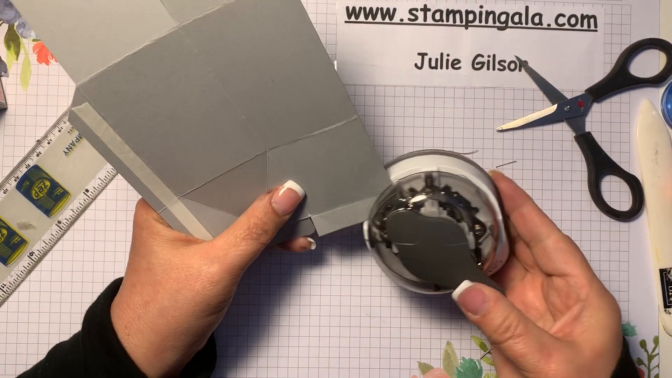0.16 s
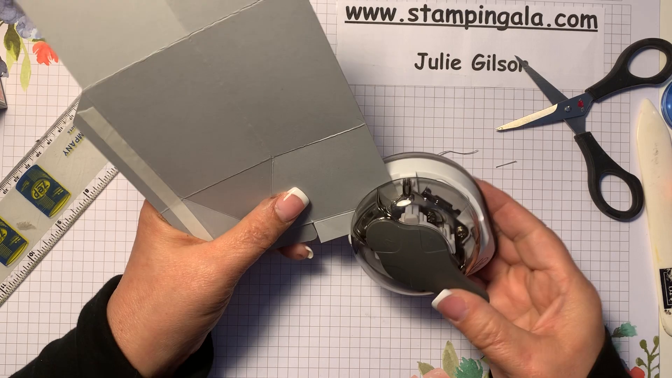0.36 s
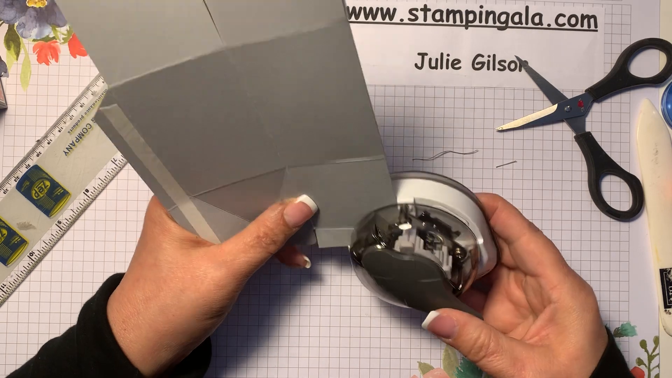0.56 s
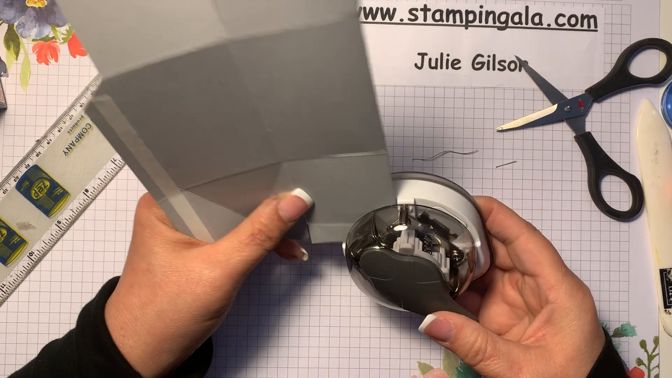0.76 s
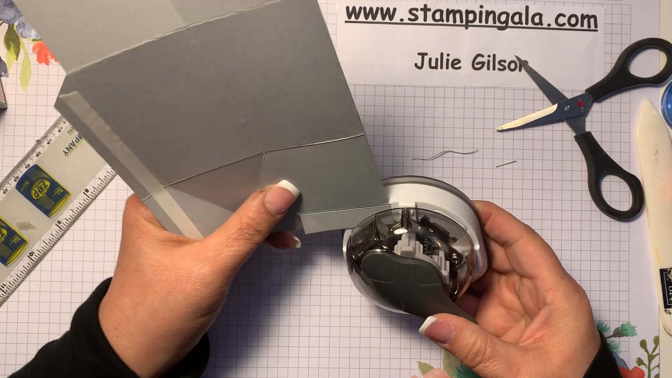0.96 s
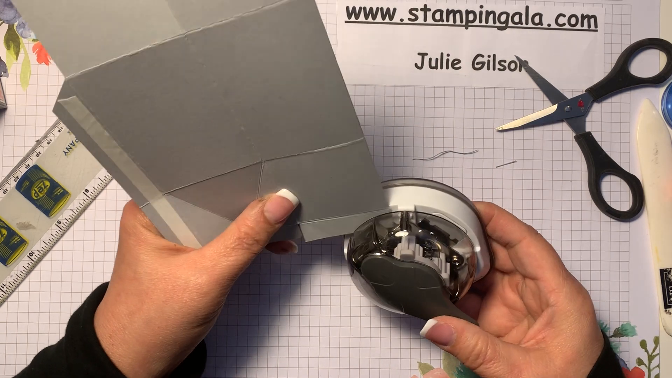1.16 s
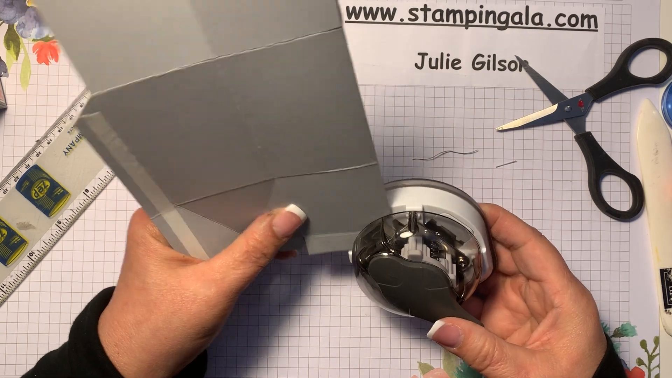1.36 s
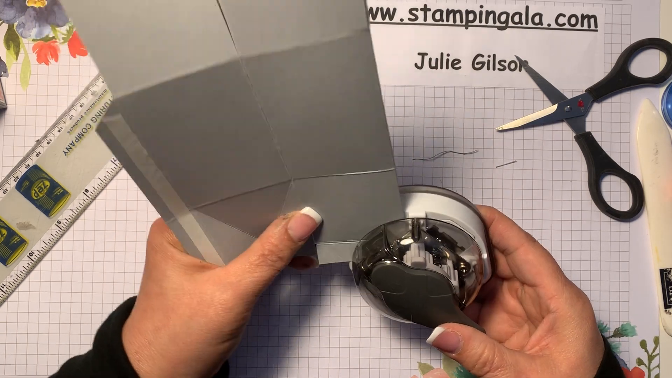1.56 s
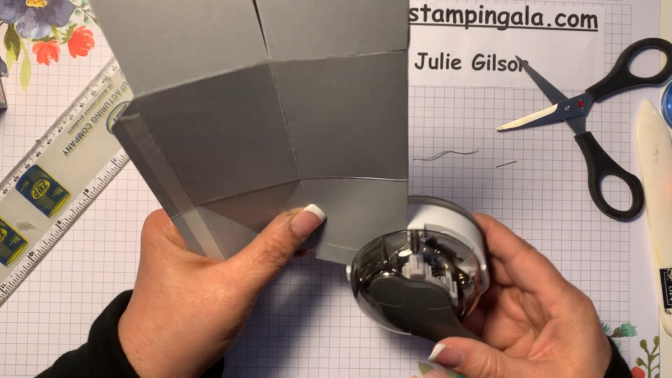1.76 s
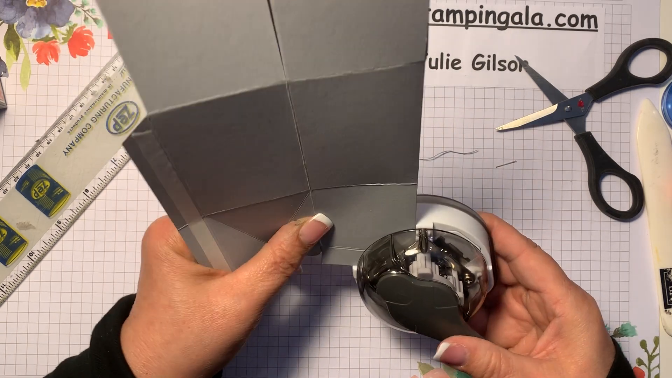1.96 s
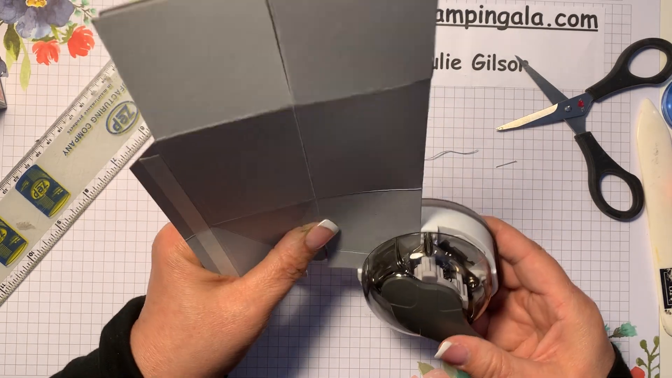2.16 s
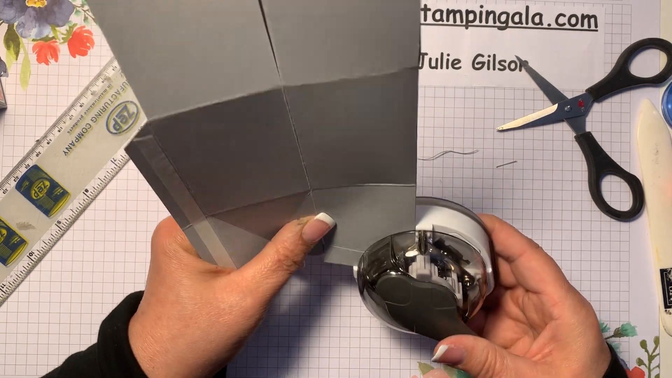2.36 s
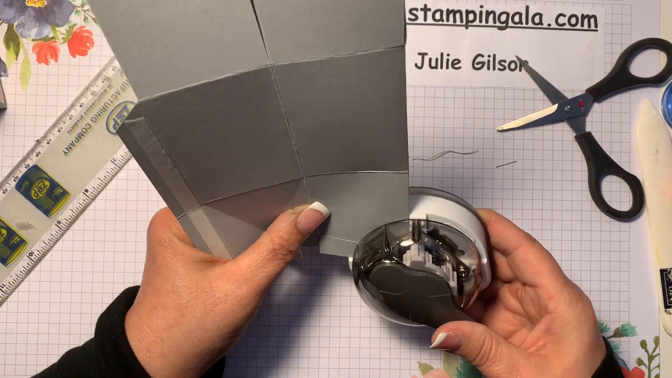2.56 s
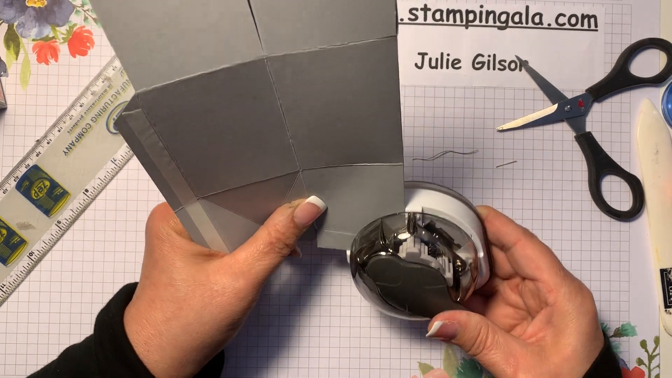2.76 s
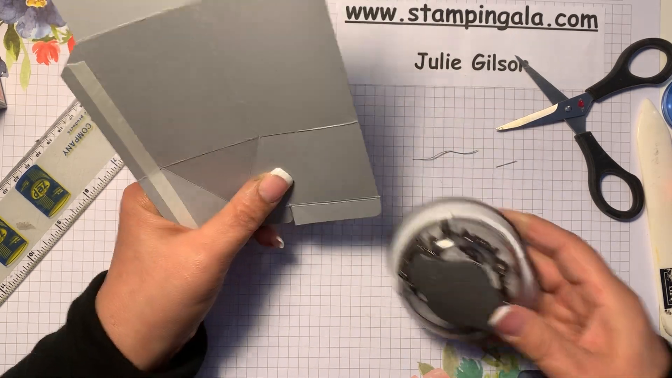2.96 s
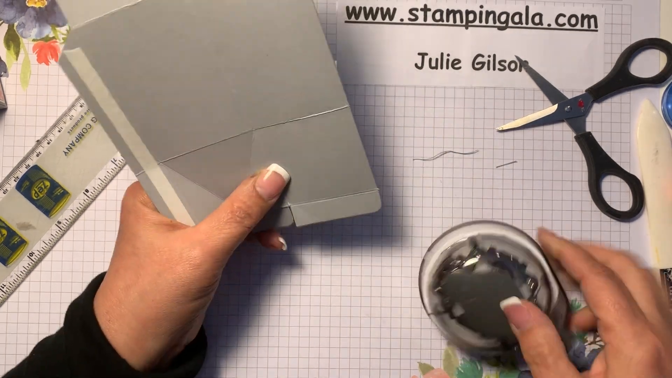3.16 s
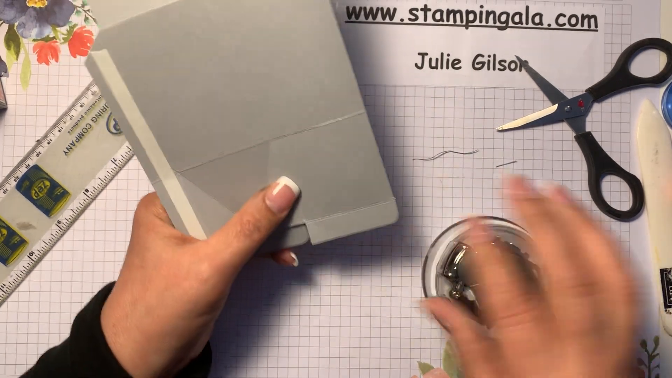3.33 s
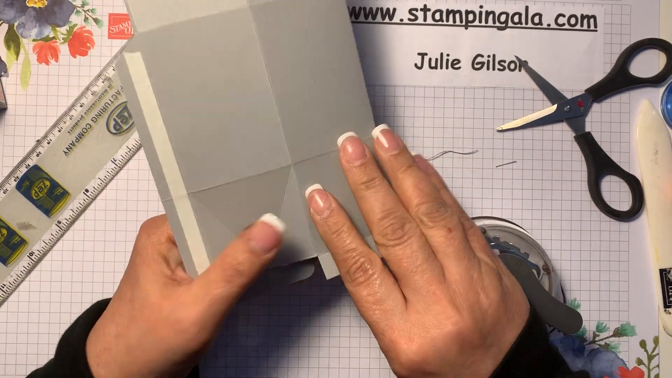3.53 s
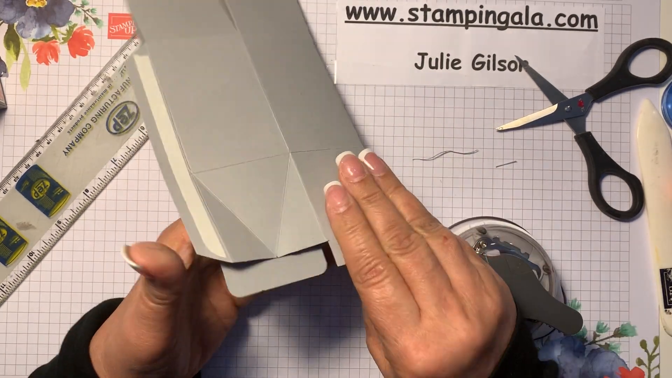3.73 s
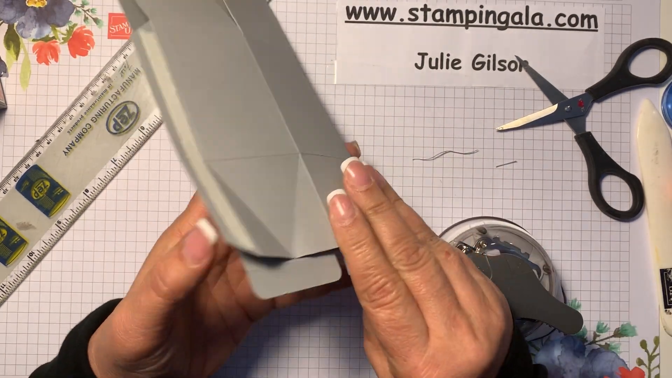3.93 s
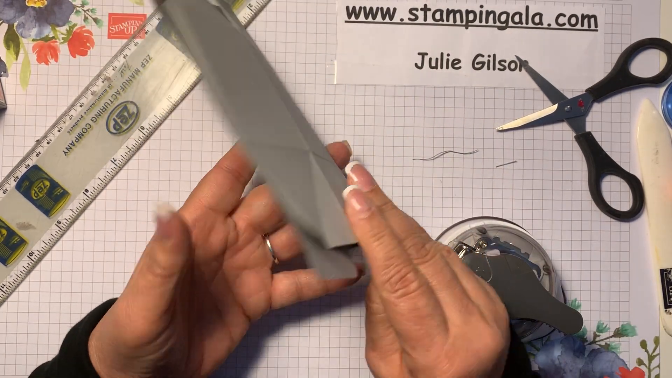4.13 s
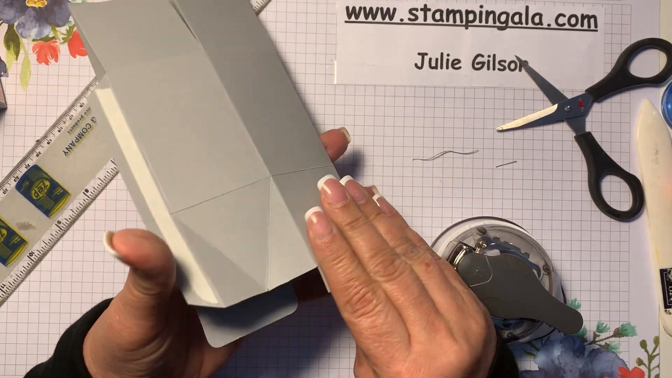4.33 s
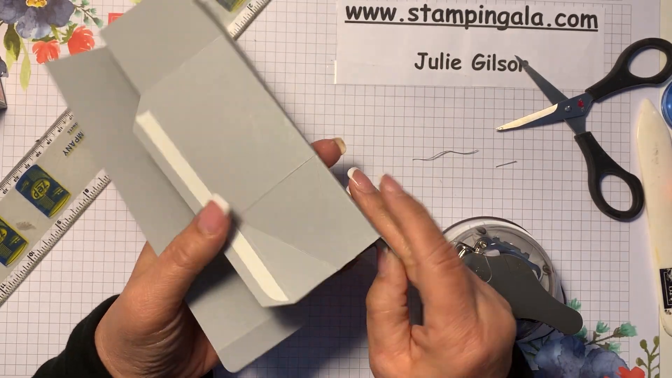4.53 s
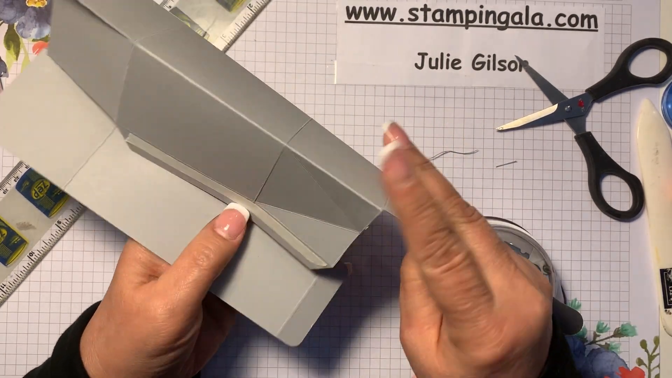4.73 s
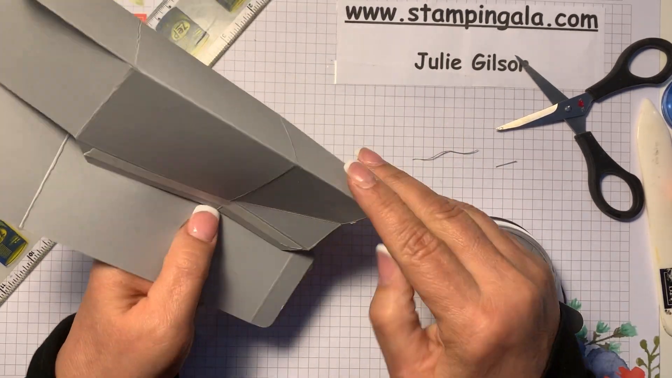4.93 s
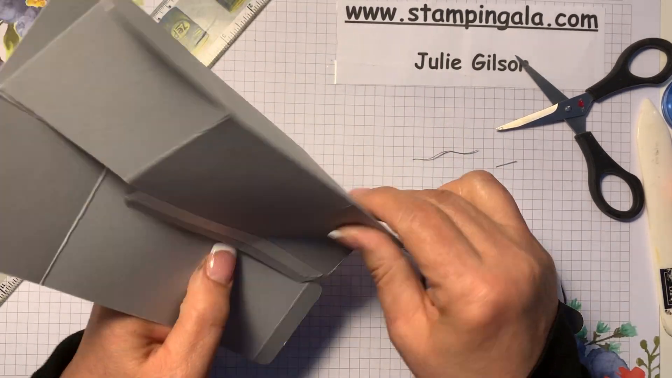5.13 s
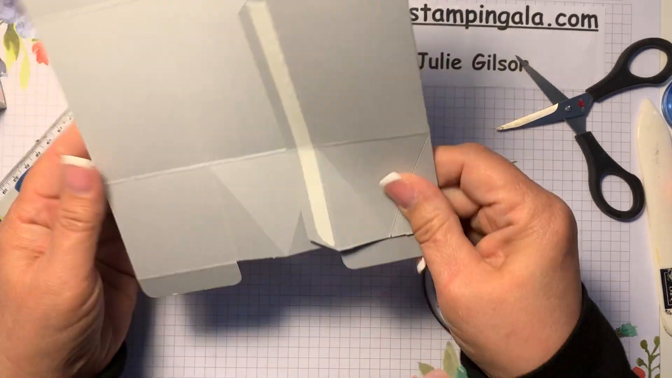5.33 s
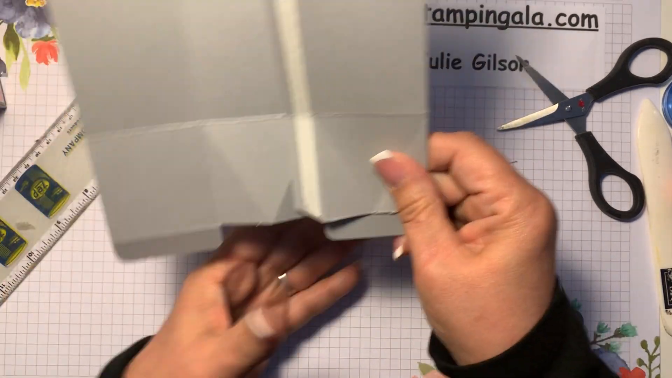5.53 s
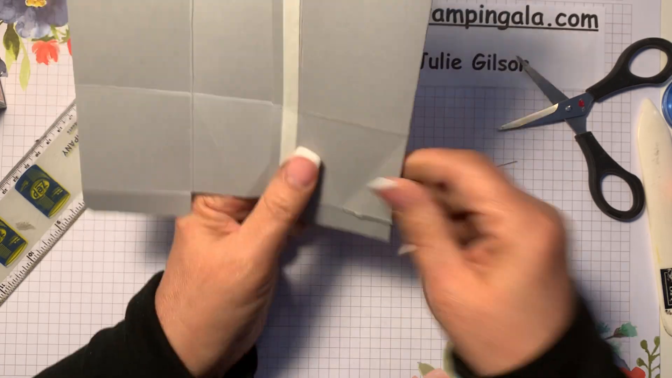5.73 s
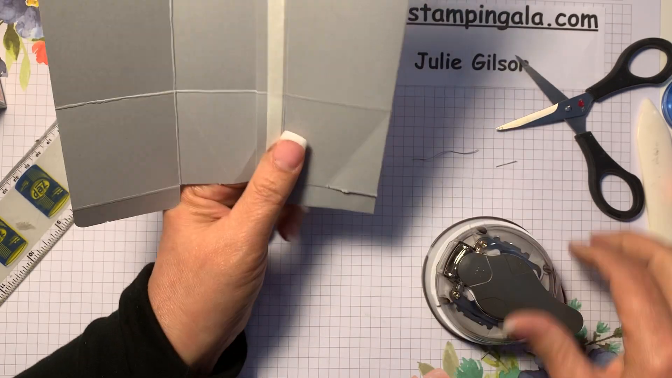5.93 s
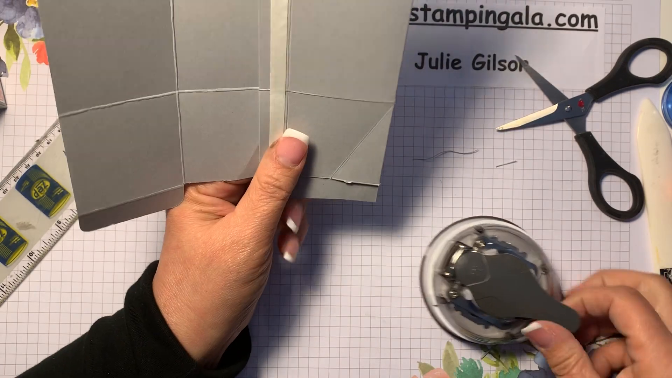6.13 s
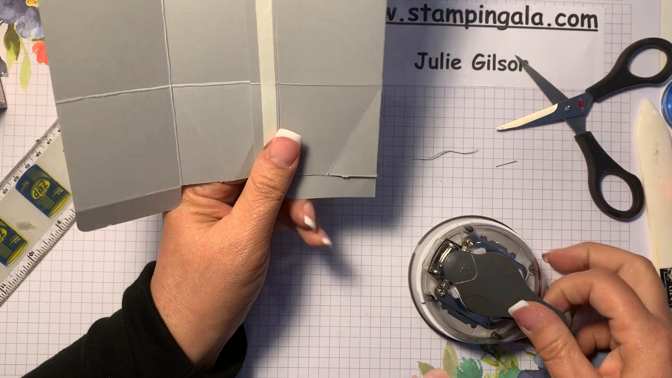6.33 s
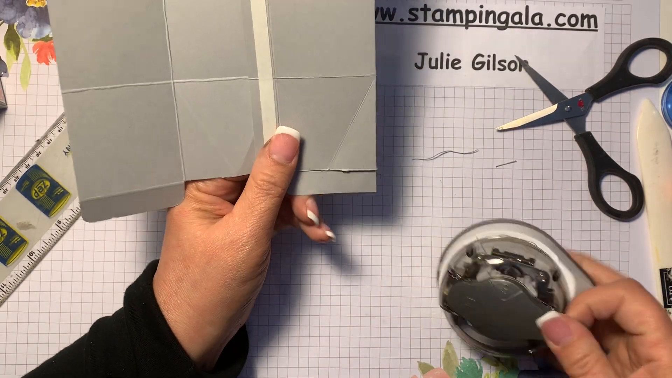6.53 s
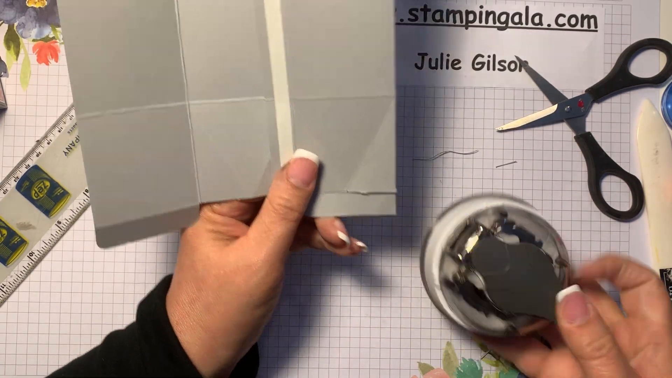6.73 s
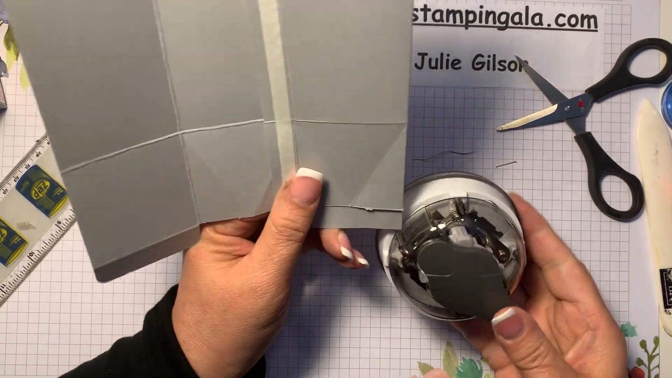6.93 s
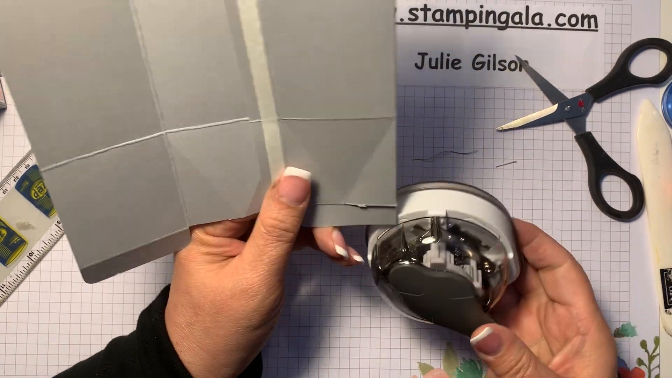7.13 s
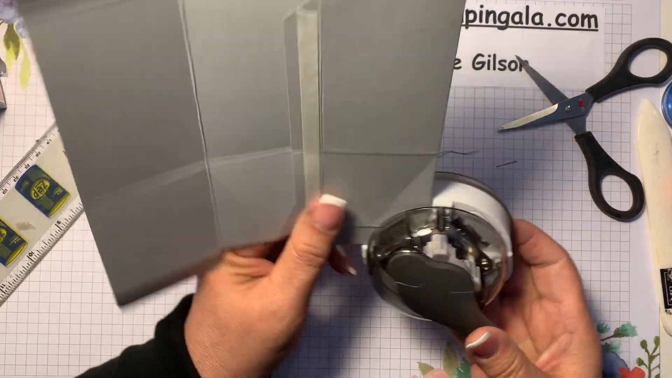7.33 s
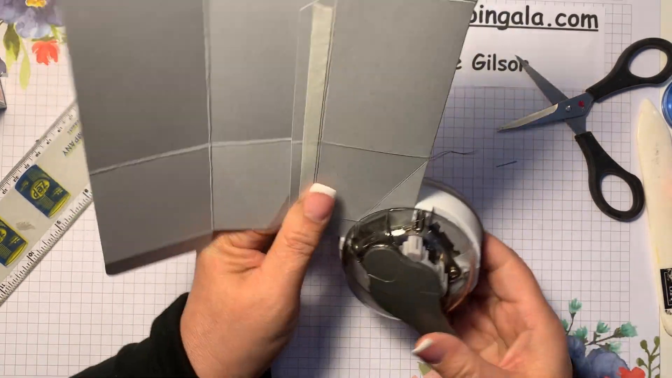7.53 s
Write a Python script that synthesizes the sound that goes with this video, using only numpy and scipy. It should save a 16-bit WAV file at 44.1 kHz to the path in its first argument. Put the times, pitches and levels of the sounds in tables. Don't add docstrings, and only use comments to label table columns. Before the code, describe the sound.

Faint card scrapes and fingernail ticks lead to a sharp mechanical bite and a rapid pair of hard, woody clunks from a hollow plastic punch on a table. Afterwards come irregular papery taps and light friction while the card is turned, low bumps as the punch is picked up, and two bright knocks near the end. Close handheld stereo pickup, dry small room, faint air.

```python
import sys
import numpy as np
from scipy import signal
from scipy.fft import rfft, irfft, next_fast_len
from scipy.io import wavfile

SR = 44100
rng = np.random.default_rng(int(sys.argv[2]) if len(sys.argv) > 2 else 0)


def magnitude_from_level(level_db):
    exponent = np.asarray(level_db, float) / 20
    return 10 ** exponent


def inscribe(sig):
    pcm = np.round(np.clip(np.atleast_2d(sig).T, -1, 1) * 32767)
    wavfile.write(sys.argv[1], SR, pcm.astype(np.int16))


N = 339129

# start in seconds, peak in dB, ring in Hz, scrape in dB relative, crack in dB relative.
PUNCH_SNAPS = [(0.04, -61, 5600, -25, 23), (2.618, -35, 730, -5.5, -12.5),
               (2.643, -40.5, 1900, -16.5, -31.5), (2.653, -12, 2250, -14.5, -8.5),
               (2.662, -18, 700, -5.5, -26), (2.683, -23.5, 1670, -18.5, -28), (2.686, -13, 2880, 2, 9),
               (2.688, -9.5, 692, -11, -22), (2.975, -22.5, 774, -8, -20.5),
               (2.971, -10.5, 3460, -6.5, -8.5), (2.974, -16, 2000, -15, -10),
               (3.097, -26.5, 2100, -3.5, -17.5), (3.26, -14.5, 2500, -8.5, -10),
               (3.268, -7, 4590, -8, 3.5), (3.268, -15, 2755, -21, -20), (6.34, -38.5, 4600, -3, 9.5)]
# start in seconds, peak in dB, ring in Hz,
# t60 in seconds.
BODY_THUDS = [(3.1, -15.5, 320, 0.037), (3.115, -17, 258, 0.046), (3.262, -12.5, 790, 0.039),
              (3.263, -7, 352, 0.027), (3.271, -8.5, 785, .05), (3.287, -14, 350, 0.069),
              (3.31, -17.5, 220, 0.088), (6.168, -28, 344, 0.093), (6.21, -45, 295, 0.14),
              (6.298, -38, 261, 0.14), (6.316, -50.5, 340, 0.071), (6.336, -41, 214, 0.18),
              (6.448, -38.5, 289, 0.11), (6.47, -41.5, 218, 0.16), (6.56, -51.5, 199.6, 0.24),
              (6.166, -32, 800, 0.043), (1.965, -38.5, 389, 0.066), (7.419, -31.5, 302, 0.074),
              (0.459, -50, 253, 0.042), (5.752, -53.5, 180.4, .08)]
# start in seconds, level in dB, ring in Hz, t60 in seconds.
LEVER_RING = [
    (3.27, -46, 344, 1.8),
]
# start in
# seconds, peak in dB, contact time in ms.
TABLE_BLOWS = [(0.34, -50, 2.2), (0.617, -44.5, 1.2), (0.914, -38, 2.2), (1.011, -40.5, 0.52),
               (1.467, -40, 0.76), (1.704, -43, 0.27), (1.963, -48.5, 0.14), (2.124, -47.5, 1.6),
               (4.318, -25.5, 10), (5.921, -47.5, 0.63), (6.06, -38.5, 2.7), (6.168, -19, 3.2),
               (6.213, -39, 3.5), (6.296, -22.5, 7.4), (6.449, -23.5, 9.8), (6.944, -44.5, 2.5),
               (7.098, -33.5, 0.85), (7.392, -30.5, 2.5), (7.419, -27, 0.45), (3.085, -29, 4.6),
               (3.099, -6, 3), (3.118, -16, 7), (3.126, 1, 12.2), (3.260, -14, 0.21), (3.270, -0.5, 0.3),
               (3.292, -24, 9), (3.361, -15.5, 4.6)]
# frequency in Hz, level in dB, t60 in seconds.
TABLE_MODES = [(56.5, -17.5, 0.15), (90.6, -11, 0.13), (121.5, -13, 0.33), (144.4, -5.5, 0.15),
               (183, -4.5, 0.067), (220, 3.5, 0.1), (264, -11, 0.33), (350, 7, 0.085), (412.4, -2, 0.089),
               (471.3, 0.5, .1), (550, 5, 0.061), (720, -5.5, .08), (785, 8.5, 0.044), (1000, -3.5, 0.091)]
# start in seconds, peak in dB, ring in Hz, edge sharpness in dB.
CARD_TAPS = [(0.177, -47, 3980, -3), (0.194, -38, 1520, -14), (.273, -33.5, 1140, -38),
             (.617, -38, 1200, -14), (.699, -32.5, 1420, -30), (1.016, -34, 977, -29),
             (1.144, -48.5, 1400, -14), (1.465, -33, 1420, -15), (1.488, -34.5, 1090, -11),
             (1.679, -31.5, 1486, -13.5), (1.701, -37.5, 1080, -70), (1.731, -39, 877.5, -31),
             (1.962, -20, 1094, -29), (2.124, -49.5, 980, -9), (2.44, -51.5, 2210, -21.5),
             (5.921, -41.5, 1532, -14.5), (6.011, -52.5, 1086, 2.5), (6.162, -24, 2070, -11),
             (6.712, -32, 2210, -41.5), (6.721, -33, 2500, -36), (6.944, -53, 785, -6.5),
             (7.099, -15.5, 969, -10), (7.392, -31.5, 1007, -29.5), (7.418, -7, 905, -40),
             (7.574, -41, 2440, -21),
             (3.554, -24.5, 887, -13), (3.589, -45.5, 1020, 0.5), (3.664, -38, 930, -9.5),
             (3.784, -25.5, 2244, -33), (3.82, -29, 983, -15.5), (3.864, -30, 1826, -16),
             (3.888, -38, 1000, -11), (3.943, -34, 600, -11.5), (4.31, -32.5, 1030, -16),
             (4.32, -28.5, 1414, -14.5), (4.346, -32, 1050, -12), (4.505, -36, 1530, -31),
             (4.646, -24.5, 1530, -9.5), (4.754, -12, 1360, -14.5), (4.92, -28.5, 1010, -20),
             (4.948, -32, 1190, -13.5), (5.08, -28.5, 1006, -14), (5.173, -29, 974, -18),
             (5.184, -29.5, 1520, -2), (5.261, -29, 990, -2.5), (5.738, -29.5, 1000, -15)]
# start in seconds, peak in dB, ring in Hz, edge sharpness in dB.
FIBRE_TICKS = [(.115, -66, 1400, -15), (0.131, -51, 1400, -19), (.179, -49, 3220, -20),
               (.243, -46, 3370, -8), (.25, -42, 3340, 4), (0.307, -37.5, 1310, -20),
               (0.491, -50, 1600, -15), (.553, -60, 3400, -10), (.564, -49, 3400, -13),
               (.587, -52, 1250, -14), (0.685, -42, 1470, -14), (.817, -43, 1470, -15),
               (.894, -49, 1310, -2), (1.094, -47, 1490, -18), (1.259, -61, 1320, -10),
               (1.391, -52, 1540, -9), (1.668, -40.5, 1400, -13), (2.288, -58.5, 920, -18),
               (2.47, -66, 2000, -25), (4.392, -48, 1100, 0), (4.481, -51, 1200, -3),
               (4.631, -43, 1000, -10.5), (4.708, -37, 1400, -14), (4.733, -36, 1400, -2),
               (4.829, -44, 1200, -10.5), (4.89, -35, 900, -11), (4.998, -59, 1000, 9.5),
               (5.025, -47, 4100, 1), (5.065, -35, 950, -14), (5.191, -30.5, 3450, -15.5),
               (5.265, -26.5, 3600, -17.5), (5.318, -31, 1000, -22.5), (5.679, -48, 950, -25),
               (6.281, -45, 2010, -3), (6.7, -46, 910, -25.5)]
# time of most pressure in seconds, rise in seconds, fall in seconds, scrape in dB, fibre hiss
# in dB relative.
CARD_SLIDES = [(.06, 0.023, 0.058, -69.5, 4), (.12, 0.0053, 0.035, -64, 9), (.25, 0.018, 0.06, -50, 8.5),
               (.33, 0.1, 0.021, -48.5, 1.5), (.5, 0.21, 0.049, -56, -3.5), (.6, 0.051, 0.042, -43.5, -0.5),
               (.696, 0.018, 0.072, -46.5, -1), (.826, 0.022, 0.14, -49.5, 3.5),
               (1.026, 0.043, 0.1, -60, 1), (1.283, 0.089, 0.041, -60.5, 1),
               (1.4, 0.024, 0.29, -60.5, 12.5), (1.48, 0.066, 0.11, -58, -31),
               (1.7, 0.025, 0.12, -57, -23.5), (1.955, 0.028, 0.023, -47.5, -6),
               (2.683, 0.034, 0.0072, -30.5, -18), (2.704, 0.0098, 0.11, -34, 5),
               (2.969, 0.061, 0.047, -39.5, -0.5), (3.1, 0.013, 0.12, -70, 15),
               (3.255, 0.28, 0.04, -53.5, 1.5), (3.283, 0.044, 0.076, -36.5, -44),
               (3.36, 0.055, 0.38, -59.5, -12),
               (3.639, 0.063, 0.055, -51, 13.5), (3.769, 0.018, 0.037, -43, 2),
               (3.867, 0.015, 0.012, -36.5, 11), (3.928, 0.15, 0.37, -60.5, -6.5),
               (4.161, 0.052, 0.064, -58, 2), (4.327, 0.022, 0.053, -50.5, -2),
               (4.4, 0.012, 0.034, -50.5, 5.5), (4.521, 0.071, 0.046, -48.5, 7),
               (4.663, 0.1, 0.25, -49, 6.5), (4.756, 0.015, 0.015, -35, 4), (4.965, 0.13, 0.019, -45, 0.5),
               (5.078, 0.048, 0.3, -62.5, -28), (5.185, 0.015, 0.16, -48, -3.5),
               (5.359, 0.19, 0.049, -45, 16), (5.43, 0.045, 0.13, -60.5, -9), (5.71, 0.029, 0.11, -55, -5),
               (5.791, 0.097, 0.018, -55.5, 13.5),
               (6.04, 0.094, 0.22, -65, -6), (6.168, 0.028, 0.12, -50, 6.5),
                (6.338, 0.021, 0.16, -78, 13.5), (6.561, 0.06, 0.094, -59.5, 6.5),
                (6.712, 0.02, 0.095, -60.5, -5), (7.103, 0.017, 0.087, -55.5, -4),
                (7.387, 0.072, 0.049, -51, 9), (7.441, 0.11, 0.018, -49, -6),
                (7.574, 0.17, 0.51, -62.5, -11), (7.654, 0.05, 0.015, -50.5, 2.5)]
# time in seconds, rise in seconds, fall in seconds, level in dB.
SHEET_FLEXES = [(.229, 0.063, 0.016, -59), (.331, 0.1, 0.039, -55.5), (1.026, 0.087, 0.28, -75),
                (1.465, 0.0052, 0.068, -52), (1.688, 0.098, 0.47, -84), (1.964, 0.025, 0.013, -49),
                (2.705, .01, 0.087, -40.5), (2.969, 0.093, 0.15, -58), (3.101, 0.0095, 0.021, -25.5),
                (3.283, 0.036, 0.075, -36), (3.556, 0.0195, .12, -72), (3.65, 0.14, 0.047, -49),
                (3.773, 0.019, 0.038, -43), (3.869, 0.034, 0.023, -46), (4.12, 0.19, 0.29, -67.5),
                (4.328, .02, 0.08, -47.5), (4.518, 0.038, 0.042, -52), (4.8, .25, 0.22, -48.5),
                (5.072, 0.014, 0.038, -47.5), (5.185, 0.019, 0.41, -54.5), (5.34, 0.68, 0.13, -61),
                (5.789, 0.088, 0.016, -53), (6.2, 0.39, 0.43, -61.5), (7.104, 0.017, 0.057, -52.5),
                (7.433, 0.056, 0.021, -38.5), (7.651, 0.17, 0.022, -64.5)]
# frequency in Hz, width in Hz, level in dB.
SHEET_MODES = [(330, 120, -8), (520, 130, -5), (780, 130, -5), (980, 110, 1), (1200, 140, -4),
               (1450, 140, -2.5), (1850, 140, -4)]
# time in seconds, rise in seconds, fall in seconds, level in dB.
BASE_SCUFFS = [
    (6.19, 0.0485, 0.35, -56.5),
    (6.57, 0.07, 0.058, -66),
    (6.715, 0.12, 0.038, -61),
]
# frequency in Hz, width in Hz, level in dB.
HOUSING_MODES = [(1020, 90, -3), (1980, 110, 0), (2350, 130, 0), (3250, 200, -8)]
# time in seconds, rise in seconds, fall in seconds,
# level in dB, pitch in Hz.
EDGE_RASPS = [(0.121, 0.1, .025, -69.5, 2100), (1.43, 0.05, 0.11, -49.5, 3550),
              (6.24, 0.05, 0.089, -60, 2000), (6.2, 0.011, 0.0096, -51, 2400),
              (8.5, 0.014, 0.01, -48, 3700), (5.6, 0.054, 0.026, -55, 3600), (8.3, 0.05, 0.073, -70, 2200),
              (3.2, 0.074, .07, -53.5, 830)]
# time in seconds, rise in seconds, fall in seconds,
# drag in dB, slow sway in dB relative.
TABLE_SHUDDERS = [(2.2, 0.38, 0.25, -90, 13), (2.75, 0.091, 0.27, -78.5, 10.5), (3.33, .1, 0.87, -59, 5),
                  (3.75, 0.77, 0.44, -60.5, -6.5), (4.35, .06, 0.15, -68.5, 6.5),
                  (5.38, 0.2, 0.2, -63, -0.5), (5.76, 0.065, 0.072, -73, 16.5),
                  (6.24, 0.24, 0.2, -53, -17.5), (6.5, 0.05, 0.18, -65, -11.5)]
# frequency in Hz, t60 in seconds.
ROOM_DECAY = [(100, 1), (500, 0.58), (2000, 0.071), (6000, 0.054), (14000, 0.38)]
# frequency in Hz, level in dB per Hz.
AIR_COLOUR = [(15, -28), (25, 7), (117, 1), (531, -4.5), (1890, -37.5), (6050, -18), (9570, -31.5),
              (16000, -23.5)]
# frequency in Hz, left in dB, right in dB, shared part from 0 to 1.
MIC_PORTS = [(107, 1.5, 0, .95), (600, -3, -5, 0.87), (1400, 3, -3, 1), (2600, 2, -0.5, 0.7),
             (4360, -1.5, -1.5, 0.1), (6300, -6.5, -3.5, 0.3), (8860, -3, -4, 1), (13600, -13, -12, 0.93)]
# frequency in Hz, lead of the right port in radians.
RIGHT_LEAD = [(40, -.15), (250, -.28), (900, -.5), (2800, -3.1), (4200, -1.6), (5950, -3.14), (7800, 0)]

TAP_ROUGH, SNAP_ROUGH = 0.7, 1.1
TAP_T60_S, SNAP_T60_S = 0.034, 0.019
HARD_TAP_SHORTENS = 0.173
BASS_LAG_CYCLES = 1.6
RESTING_DB, TABLE_RESTING_DB = -81, -85.5
SLIDE_SHAKES_SHEET_DB = -14.5
STROKE_ROUNDNESS = 1.4
ROOM_TONE_DB = -75.5
TREBLE_TURN_HZ = 3700


def punch_snaps():
    events = [(*row, SNAP_T60_S) for row in PUNCH_SNAPS]
    return contacts(events, ring_db=-2.0, scrape_db=3.5, crack_db=9.0, rise_s=0.00087, rough=SNAP_ROUGH)


def contacts(events, ring_db, scrape_db, crack_db, rise_s, rough):
    length = 4096
    out, t = np.zeros((2, N + length)), np.arange(length) / SR
    noises = rng.standard_normal((len(events), 3, 2, length))
    scrapes = rms_one(band(noises[:, 1], 1200, 5600))
    cracks = rms_one(band(noises[:, 2], 7800, 16500))
    for k, (s, db, hz, scrape_rel, crack_rel, t60) in enumerate(events):
        t60 = np.clip(t60, 0.004, 0.2)
        shape = (1 - np.exp(-t / rise_s)) * magnitude_from_level(-60 * t / t60) * (1 - t / t[-1])
        push_noise = rms_one(band(noises[k, 0], 0.63 * hz, 1.266 * hz))
        tone = np.sin(2 * np.pi * hz * t) + rough * push_noise
        scrape = magnitude_from_level(scrape_rel + scrape_db) * scrapes[k]
        crack = magnitude_from_level(crack_rel + crack_db) * cracks[k] * magnitude_from_level(-25 * t / t60)
        start = round(s * SR)
        out[:, start:start + length] += magnitude_from_level(db) * shape * (magnitude_from_level(ring_db) * tone + scrape + crack)
    return out[:, :N]


def rms_one(x):
    return x / np.sqrt(np.mean(x ** 2) + 1e-20)


def band(x, low_hz, high_hz):
    edges = [low_hz, min(high_hz, 0.45 * SR)]
    return signal.sosfilt(signal.butter(2, edges, "band", fs=SR, output="sos"), x)


def body_thuds():
    events = [(s, db, hz, -30, -40, t60) for s, db, hz, t60 in BODY_THUDS]
    return contacts(events, ring_db=0.5, scrape_db=-0.5, crack_db=1.5, rise_s=0.0005, rough=0.4)


def lever_hum():
    s, db, hz, t60 = LEVER_RING[0]
    push = np.zeros(N)
    push[round(s * SR)] = magnitude_from_level(db)
    return ring(push, hz, t60)


def ring(push, hz, t60):
    r, w = magnitude_from_level(-60 / (t60 * SR)), 2 * np.pi * hz / SR
    return signal.lfilter([0, np.sin(w)], [1, -2 * r * np.cos(w), r * r], push + 1e-18)


def table_knocks():
    s, db, contact_ms = np.transpose(TABLE_BLOWS)
    out = np.zeros(N)
    spread = rng.normal(0, 1, (len(s), len(TABLE_MODES)))
    for k, (hz, mode_db, t60) in enumerate(TABLE_MODES):
        strength = magnitude_from_level(db + mode_db - 13.5 + 2 * spread[:, k]) * rng.choice([-1, 1], len(s))
        softness = 1 + (hz * contact_ms / 1000) ** 2
        lag_s = BASS_LAG_CYCLES * rng.uniform(0.4, 1, len(s)) * max(1 / hz - 0.002, 0)
        push = np.zeros(N)
        push[np.round((s + lag_s) * SR).astype(int)] = strength / softness
        out += ring(push, hz, t60)
    return band(out, 75, 9000)


def card_taps():
    events = []
    for s, db, hz, sharp_db in CARD_TAPS:
        t60 = TAP_T60_S * magnitude_from_level(-HARD_TAP_SHORTENS * (db + 33.5))
        events.append((s, db, hz, sharp_db, sharp_db, t60))
    return contacts(events, ring_db=-3.5, scrape_db=3.0, crack_db=9.5, rise_s=0.0013, rough=TAP_ROUGH)


def fibre_ticks():
    events = [(*row, row[-1], 0.02) for row in FIBRE_TICKS]
    return contacts(events, ring_db=-3.5, scrape_db=2.5, crack_db=6.0, rise_s=0.00096, rough=SNAP_ROUGH)


def rubbing():
    slides = CARD_SLIDES
    scrape = strokes(slides, RESTING_DB)
    hiss = strokes(slides, RESTING_DB + 6.0, second=True)
    body = strokes(SHEET_FLEXES, RESTING_DB - 4.0) + magnitude_from_level(SLIDE_SHAKES_SHEET_DB) * scrape
    force = friction(catch_per_s=300.0, catch_db=2.2, flutter_db=1.8)
    flap = magnitude_from_level(-12.0) * body * rms_one(band(force, 62, 210))
    edge_modes = [(hz, 0.06 * hz, -9 * abs(np.log(hz / 3600))) for hz in np.geomspace(2100, 5800, 13)]
    card = body * flexed(force, SHEET_MODES, wander_db=3.0) + scrape * flexed(force, edge_modes, wander_db=6.0)
    fibres = band(force, 8430, 21000)
    fibres = signal.sosfilt(signal.cheby2(8, 40, 16500, fs=SR, output="sos"), fibres)
    scuff = strokes(BASE_SCUFFS, -99) * flexed(force, HOUSING_MODES, wander_db=3.5)
    rasp = sum(strokes([row], -110) * rms_one(ring(force, row[-1], 0.014)) for row in EDGE_RASPS)
    return table_shudder(force[0]) + flap + band(card, 220, 4800) + hiss * rms_one(fibres) + scuff + rasp


def table_shudder(force):
    drag = strokes(TABLE_SHUDDERS, TABLE_RESTING_DB)
    sway = strokes(TABLE_SHUDDERS, TABLE_RESTING_DB + 1.5, second=True)
    low_modes = [row for row in TABLE_MODES if 100 < row[0] < 450]
    top = sum(magnitude_from_level(db) * rms_one(ring(force, hz, 1.2 * t60)) for hz, db, t60 in low_modes)
    return sway * rms_one(band(force, 15, 80)) + drag * rms_one(top)


def strokes(rows, resting_db, second=False):
    t = np.arange(0, N + 32, 32) / SR
    out = magnitude_from_level(resting_db)
    for s, rise_s, fall_s, db, *rel_db in rows:
        away = np.maximum((s - t) / max(rise_s, 0.004), (t - s) / max(fall_s, 0.004))
        out = out + magnitude_from_level(db + second * sum(rel_db) - 20 * away ** STROKE_ROUNDNESS)
    return np.interp(np.arange(N) / SR, t, out)


def friction(catch_per_s, catch_db, flutter_db):
    catches = (rng.random(N) < catch_per_s / SR) * rng.exponential(1, N)
    grain = signal.lfilter([1], [1, -0.985], catches)
    flutter = rms_one(band(rng.standard_normal(N), 13.1, 28))
    pressure = magnitude_from_level(catch_db * np.minimum(grain, 3) + flutter_db * flutter)
    return pressure * rng.standard_normal((2, N))


def flexed(force, modes, wander_db):
    total = 0
    for (hz, width, db), wander in zip(modes, bending(len(modes), per_s=12.0)):
        total = total + magnitude_from_level(db + wander_db * wander) * rms_one(ring(force, hz, 2.08 / width))
    return rms_one(total)


def bending(count, per_s):
    knots = np.minimum(rng.standard_normal((count, round(per_s * N / SR) + 2)), 1.1)
    return [np.interp(np.linspace(0, len(k) - 1, N), np.arange(len(k)), k) for k in knots]


def room(x, first_wall_s):
    t, tail = np.arange(SR // 2 + 4000) / SR, 0
    edges = 60 * 2 ** np.arange(0, 8.6, 1.0)
    for low, high in zip(edges, edges[1:]):
        decay = magnitude_from_level(-60 * t / at_hz(ROOM_DECAY, np.sqrt(low * high)))
        tail = tail + band(rng.standard_normal((2, len(t))), low, high) * decay
    tail = np.pad(tail, ((0, 0), (round(first_wall_s * SR), 0)))
    tail = tail / np.sqrt(np.sum(tail ** 2) / 2)
    return signal.fftconvolve(x, tail, axes=1)[:, :N]


def at_hz(points, hz, axis=1):
    points = np.array(points)
    return np.interp(np.log(hz + 1), np.log(points[:, 0]), points[:, axis])


def room_tone():
    size = next_fast_len(N)
    colour = magnitude_from_level(at_hz(AIR_COLOUR, np.fft.rfftfreq(size, 1 / SR)))
    air = irfft(rfft(rng.standard_normal((2, size))) * colour, size)[:, :N]
    return magnitude_from_level(ROOM_TONE_DB) * rms_one(air)


def scene():
    near = punch_snaps() + body_thuds() + lever_hum() + table_knocks()
    near = near + card_taps() + fibre_ticks() + rubbing()
    return near + magnitude_from_level(-28.0) * room(near, first_wall_s=0.013) + room_tone()


def low_pass(x):
    return signal.sosfilt(signal.butter(12, 17010, fs=SR, output="sos"), x)


def record(dry):
    size = next_fast_len(N + 512)
    hz = np.fft.rfftfreq(size, 1 / SR)
    near, other = rfft(dry, size)
    corner_hz, phase = np.transpose(RIGHT_LEAD)
    treble_turn = 2 * np.pi * np.maximum(hz - corner_hz[-1], 0) / TREBLE_TURN_HZ
    turn = np.interp(hz, corner_hz, phase) + treble_turn
    shared = np.clip(at_hz(MIC_PORTS, hz, axis=3), 0, 1)
    right = shared * np.exp(1j * turn) * near + np.sqrt(1 - shared ** 2) * other
    ports = [near * magnitude_from_level(at_hz(MIC_PORTS, hz, axis=1)), right * magnitude_from_level(at_hz(MIC_PORTS, hz, axis=2))]
    limited = 1.1 * np.tanh(irfft(ports, size)[:, :N] / 1.1)
    heard = signal.sosfilt(signal.cheby2(10, 50, 16900, fs=SR, output="sos"), limited)
    return low_pass(heard)


dry = scene()
out = record(dry)
inscribe(out)
```